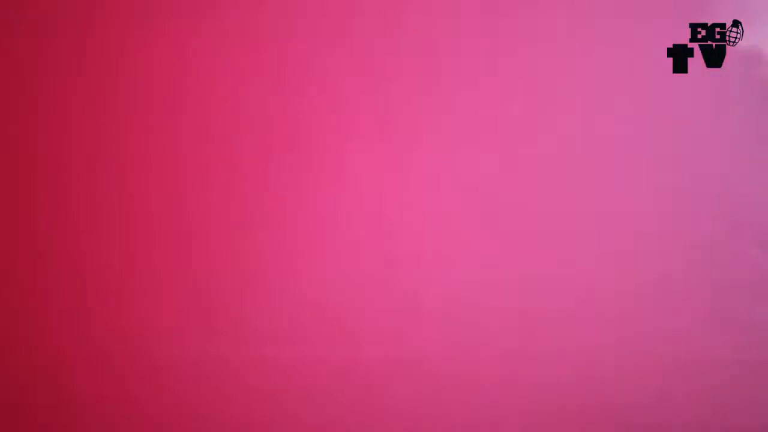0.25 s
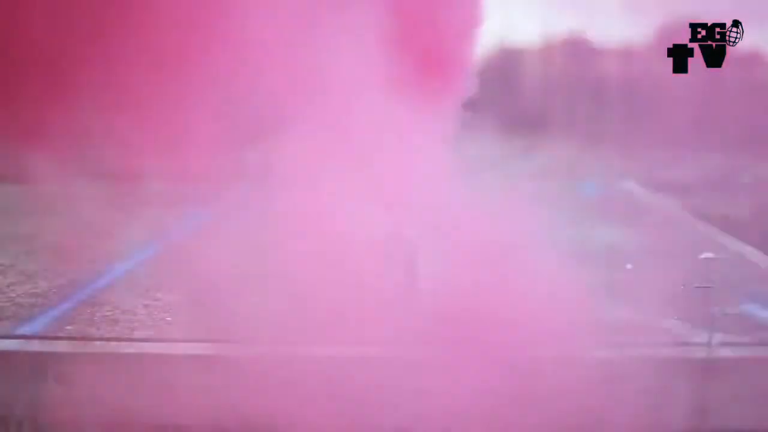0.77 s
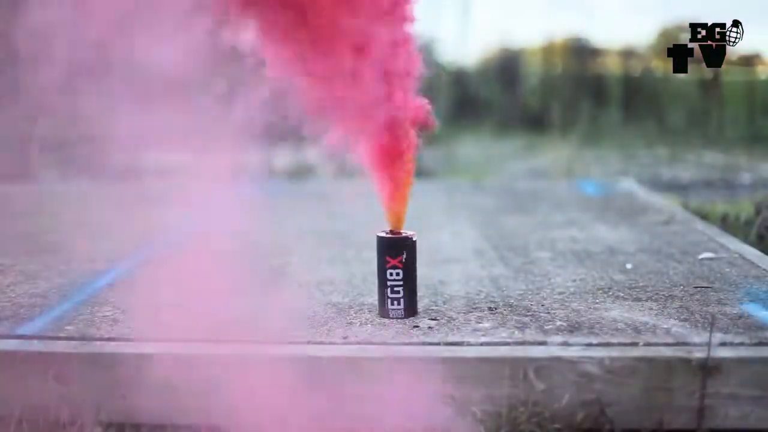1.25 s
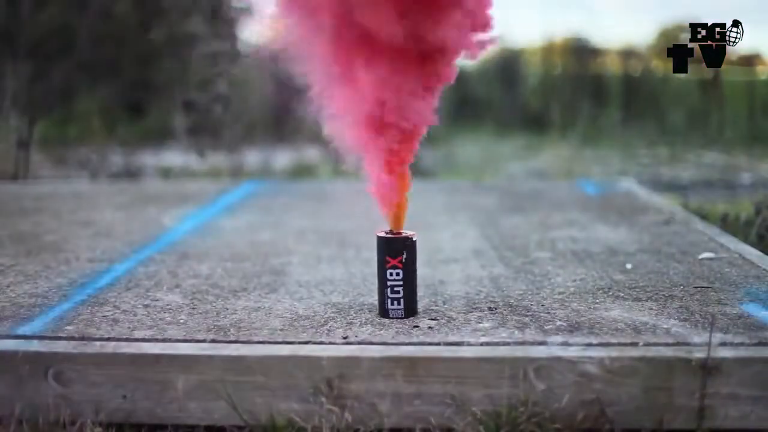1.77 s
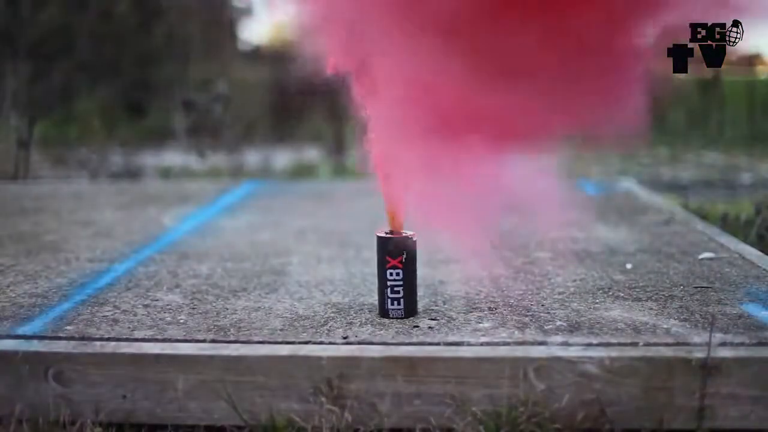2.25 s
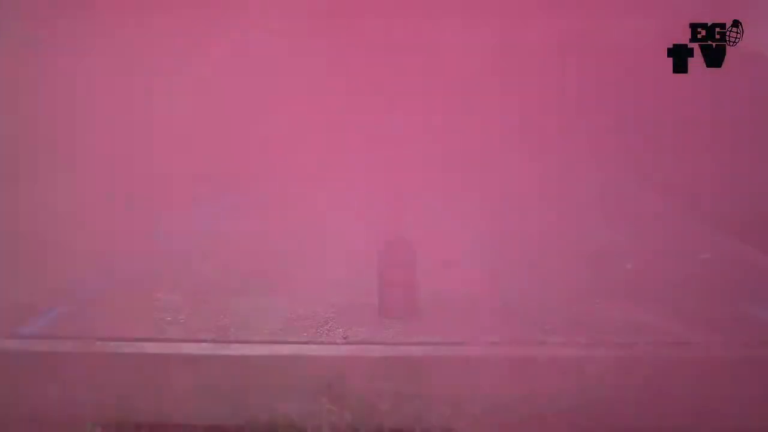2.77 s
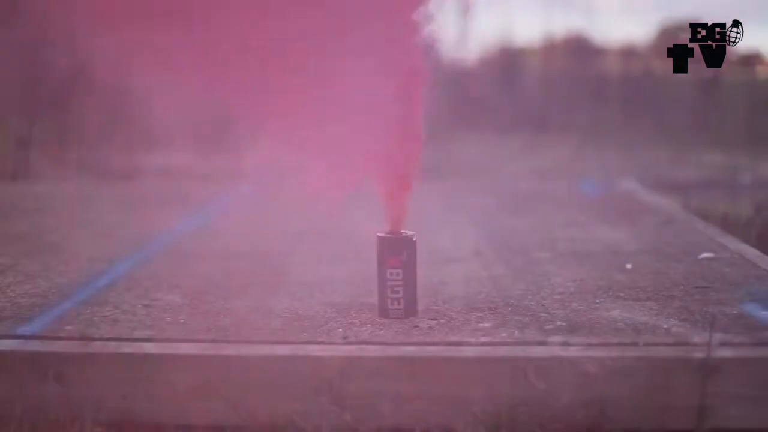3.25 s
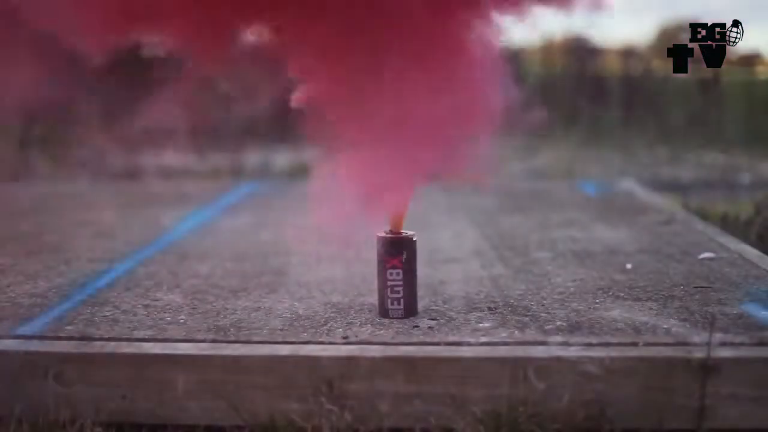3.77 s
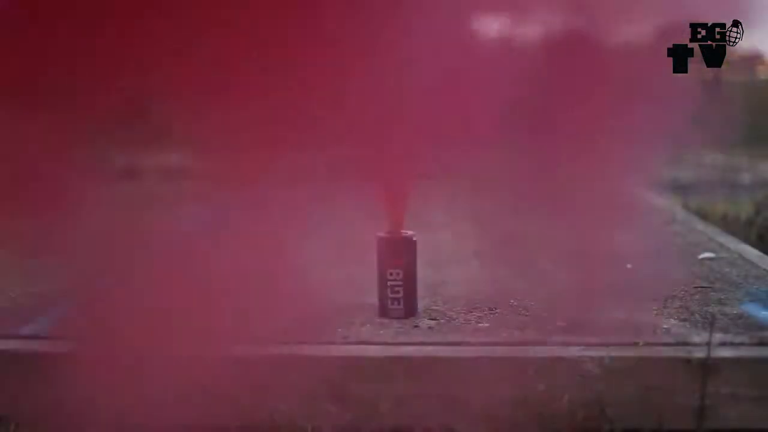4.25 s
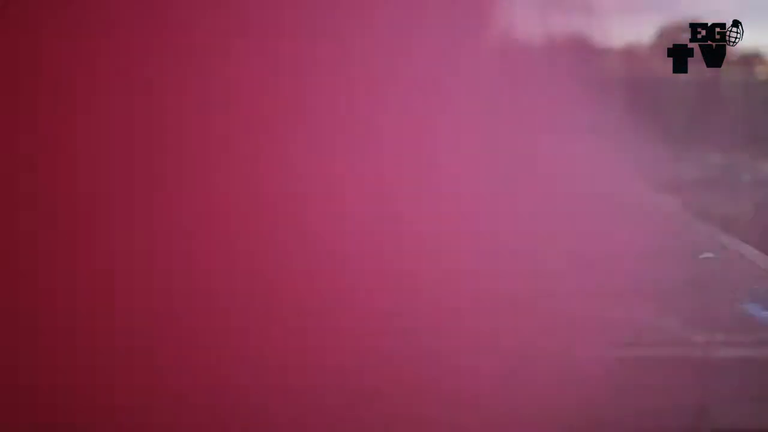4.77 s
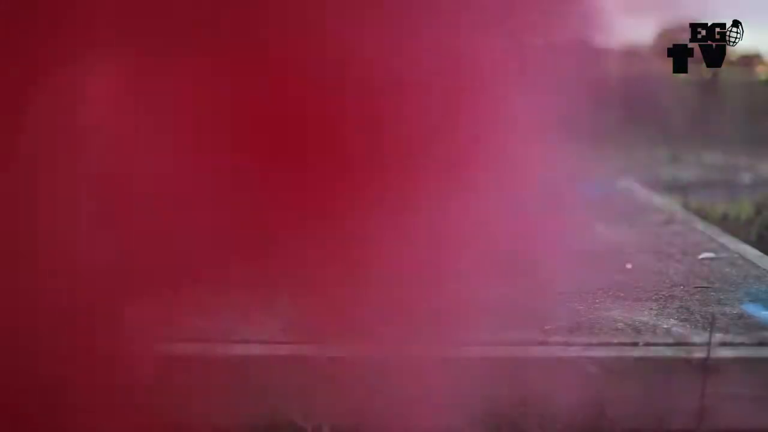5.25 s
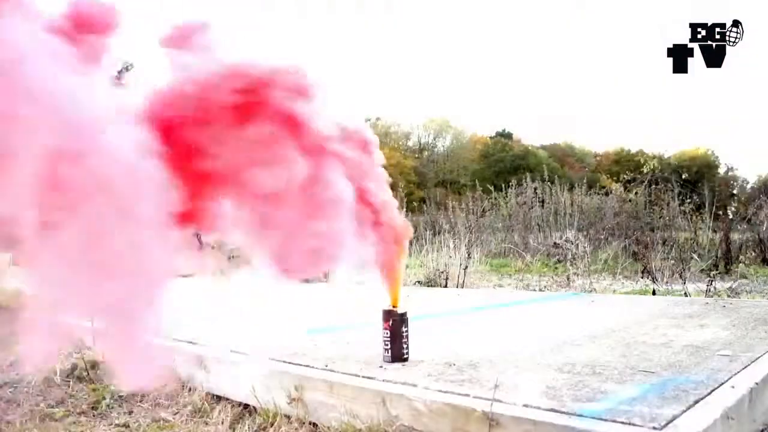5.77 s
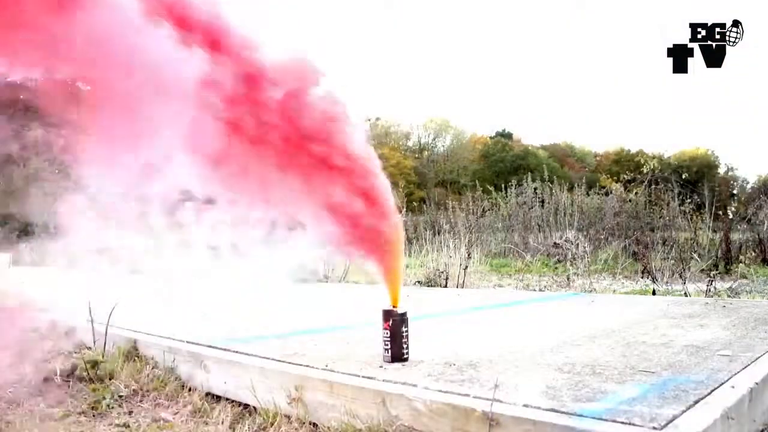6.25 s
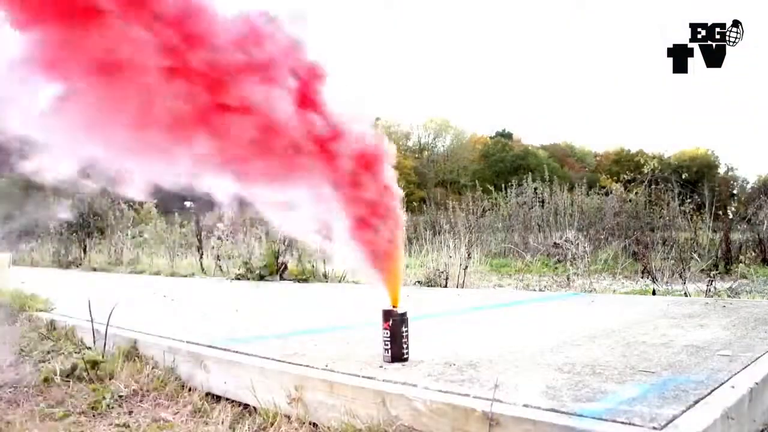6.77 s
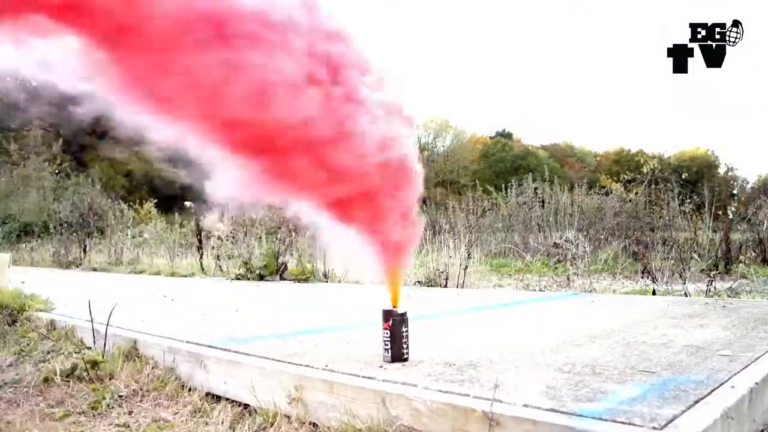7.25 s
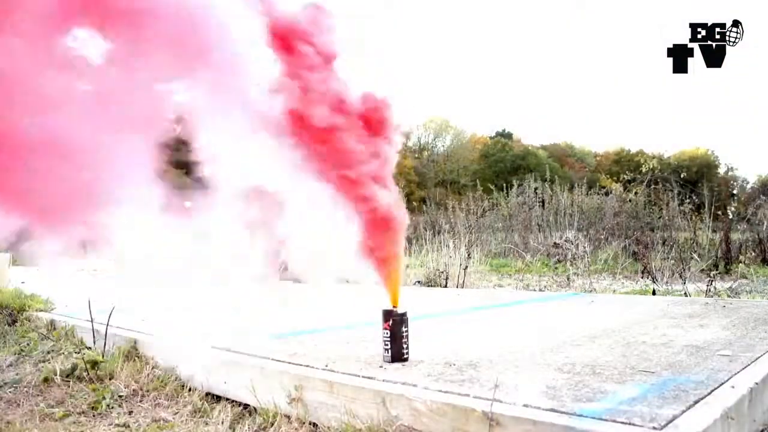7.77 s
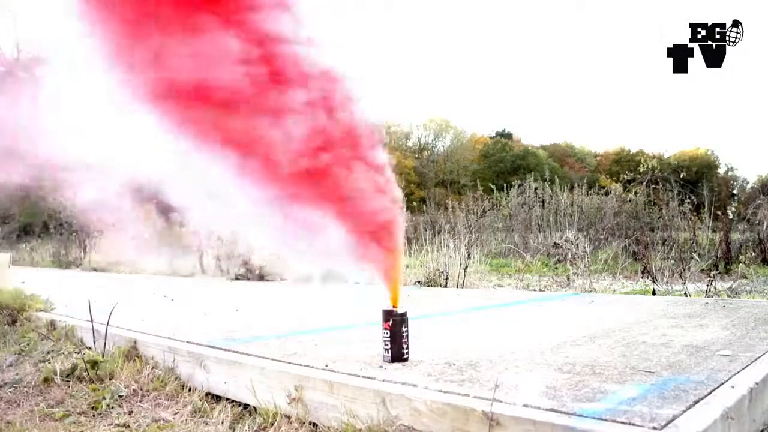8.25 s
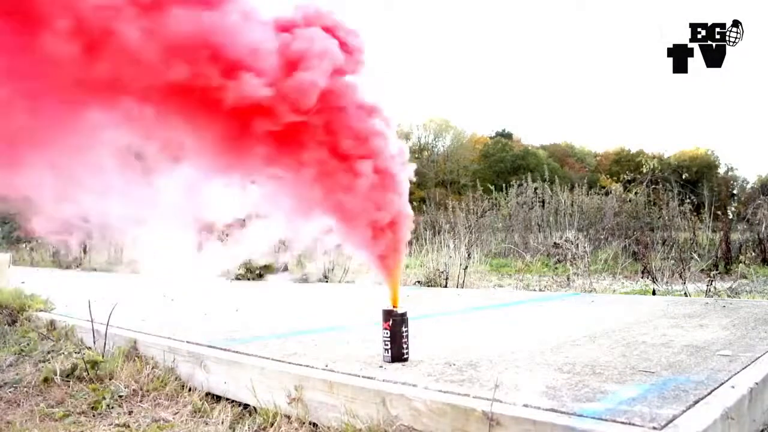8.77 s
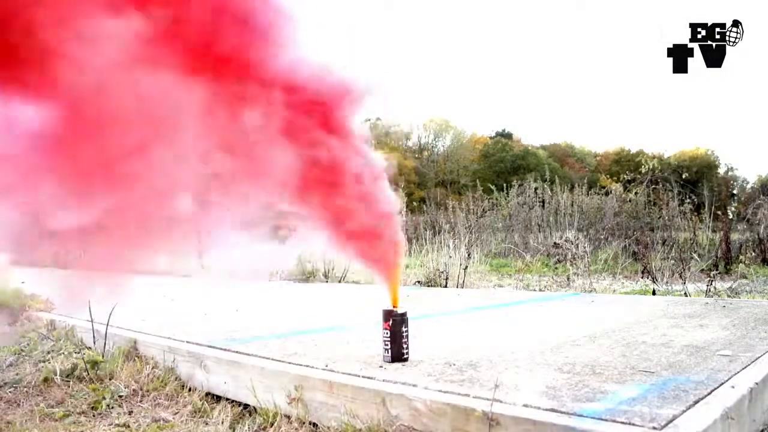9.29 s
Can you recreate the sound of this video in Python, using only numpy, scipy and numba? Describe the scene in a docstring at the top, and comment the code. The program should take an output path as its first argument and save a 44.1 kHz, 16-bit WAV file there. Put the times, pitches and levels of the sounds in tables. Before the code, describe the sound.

A pressurised jet of smoke hisses loudly beside the microphone outdoors, battered by low wind thumps, then abruptly sounds duller and more distant, fading under rumbling gusts.

```python
"""A gas jet hisses very close to the microphone, with hard wind thumps and ragged buffeting over it.
It is a smoke grenade burning on a concrete slab outdoors, heard in mono, then abruptly from further off in stereo.
Filtered noise with sparse impulses makes the jet; its level and treble follow curves and random flutter.
Wind is impulses through a moving low-pass plus deep noise; each thump is a push, a suck and a swing back."""
import sys
import numpy as np
from scipy import signal
from scipy.fft import rfft, irfft, next_fast_len
from scipy.io import wavfile
from scipy.ndimage import uniform_filter1d
from numba import njit

SR = 44100
rng = np.random.default_rng(int(sys.argv[2]) if len(sys.argv) > 2 else 0)


def dump(signal):
    """Clip the signal to [-1, 1] and save it as 16-bit WAV at the path in sys.argv[1]."""
    limited = np.clip(np.atleast_2d(signal).T, -1, 1)
    pcm = np.round(limited * 32767).astype(np.int16)
    wavfile.write(sys.argv[1], SR, pcm)


N = 419815
TIME = np.arange(N) / SR  # s
FREQ = np.maximum(np.arange(N // 2 + 1) * SR / N, 1)  # Hz

# the two microphone positions change over at this moment
CUT_S = 5.582

# jet from close by, before the trim: start_s, level_db, treble_db (relative to the level)
NEAR_JET_CURVE = [(0, -22, -3), (.8, -21.5, -4), (1.02, -18.5, -8), (1.16, -22, -5), (1.69, -22.5, -6),
                  (2.1, -22, -7), (2.84, -21.5, -5), (3.08, -23.5, -4.5), (3.75, -22.5, -2.5),
                  (4.28, -21, -4), (4.64, -21.5, -1.6), (4.97, -23, -5.5), (5.13, -26, -1),
                  (5.36, -28, -2.5), (5.45, -30, -6.5), (5.57, -30.5, -3.5)]
# jet from further off, fading as the wind bends the plume away, before the trim: start_s, level_db
FAR_JET_CURVE = [(5.6, -29.7), (5.95, -29.3), (6.3, -27), (7.06, -28), (7.3, -32.5), (7.56, -36),
                 (8.06, -29.5), (8.42, -31.5), (8.57, -31.5), (8.66, -34.5), (8.97, -39.5), (9.28, -36.5),
                 (9.5, -40.5)]
# broad colour of the jet at each distance: pitch_hz, density_db (dB per Hz)
NEAR_JET_COLOUR = [(60, -17), (280, -8), (500, -14), (700, -17), (1000, -12), (1650, -8.5), (2100, -0.5),
                   (2800, -2), (4000, -3), (6200, -4.5), (7100, -10), (10000, -20), (11500, -25),
                   (15500, -32.5)]
FAR_JET_COLOUR = [(60, -3.5), (350, -3.5), (480, -8), (660, -14.5), (1050, -7.5), (1500, -13), (2150, -1.5),
                  (2700, -1.5), (3700, -6.5), (4500, -12.5), (5500, -14.5), (7600, -22), (12500, -19.5),
                  (14000, -30)]
# vent resonances (+) and interference dips from the slab (-): centre_hz, width_hz, height_db
NEAR_RESONANCES = [(2400, 170, 3), (2850, 230, -2.5), (3340, 360, 2), (4745, 320, -4.5), (5330, 330, 1.5)]
FAR_RESONANCES = [(1636, 260, -11), (2270, 180, 3), (3200, 310, -5.5), (3600, 330, 1), (4760, 260, -6)]
# sound scattered by the surroundings: pitch_hz, level_db (relative to the direct hiss)
SCATTER_COLOUR = [(200, -17), (1200, -7.5), (2500, -12), (5000, -1), (9000, -3.5), (14000, -9.5)]
# a brighter jet also roars more: roar against hiss per dB of treble, and the treble where the two are even
ROAR_PER_TREBLE, EVEN_TREBLE_DB = 0.72, -4.5
# far off the treble fades less than the rest: its share at full level, that level, and dB gained per dB of fade
FAR_TREBLE_DB, FAR_FULL_DB, TREBLE_PER_FADE = -12, -26.5, 0.22
# harder wind tosses the plume more: level spread in calm air, and its growth per dB of buffeting
CALM_SURGE_DB, SURGE_PER_BUFFET = 0.09, 0.024

# single strong eddies, before the common gain and sharpening:
# centre_s, level_db, pitch_hz, pan_db (left minus right)
THUMP_EDDIES = [(0.08, -12.5, 100, 0), (0.09, -10, 231, 0), (0.351, -18, 80, 0), (1.207, -10.5, 120, 0),
                (1.311, -8, 111, 0), (1.338, -13, 110, 0), (1.443, -16, 100, 0), (1.499, -10, 210, 0),
                (1.567, -11.5, 200, 0), (1.62, -9, 227, 0), (1.996, -16.5, 100, 0), (2.156, -13, 190, 0),
                (2.197, -10.5, 200, 0), (2.544, -16, 100, 0), (2.65, -17.5, 130, 0), (2.777, -14.5, 110, 0),
                (2.942, -11.5, 136, 0), (4.882, -9, 110, 0), (4.931, -5, 150, 0), (4.949, -11, 150, 0),
                (4.965, -10, 140, 0), (5.038, -11, 130, 0), (5.125, -6, 162, 0), (5.186, -11.2, 200, 0),
                (5.224, -12.5, 100, 0), (5.357, -7, 190, 0), (5.376, -3, 167, 0), (5.382, -7, 343, 0),
                (5.485, -3.5, 119, 0), (5.503, -13, 110, 0), (5.568, -7.5, 180, 0.5),
                (7.742, -7.5, 151, -28)]
# gusts on the microphone, before the trim:
# start_s, length_s, buffet_db, rumble_db, pan_db (left minus right)
WIND_GUSTS = [(0.06, 0.032, -33, -29, 3), (0.13, 0.46, -40, -38, 0), (0.92, 0.09, -48, -40, -2),
              (1.169, 0.062, -25.5, -29, 1), (1.29, 0.076, -25.5, -30, 0.5), (1.428, 0.22, -27, -35, 1.5),
              (1.732, 0.34, -33, -33.5, 0), (2.11, 0.15, -34, -28.5, -2), (2.302, 0.22, -36.5, -36, -1),
              (2.526, 0.38, -33, -34.5, -1), (2.977, 0.078, -39, -38, 0), (3.664, 0.15, -39.5, -42, -2),
              (4.152, 0.24, -39, -38, 0), (4.506, 0.056, -32, -32, 1), (4.737, 0.15, -32, -32, 0),
              (4.856, 0.094, -21.5, -20, -2), (4.99, 0.054, -24.5, -23, 2), (5.12, 0.17, -28, -30.5, 3),
              (5.332, 0.041, -16.5, -22, 1.5), (5.454, 0.038, -18.5, -22, -0.5), (5.55, 0.03, -16, -23, -6),
              (5.598, 0.1, -49, -27.5, -17), (6.589, 0.12, -36, -21.5, 17), (6.893, 0.15, -38, -26.5, 2),
              (7.078, 0.14, -27.5, -22, -15), (7.238, 0.072, -22, -25, -16), (7.362, 0.14, -24.5, -27, -23),
              (7.26, 0.48, -37, -31.5, -4), (7.7, 0.079, -26, -23, -22), (7.846, 0.17, -41, -27, -5),
              (8.07, 0.46, -42, -25, 6), (8.567, 0.054, -29, -18.5, 9), (8.665, 0.19, -24, -23.5, 1.5),
              (8.871, 0.11, -22, -22, -8), (9.038, 0.06, -31, -27, 13), (9.13, 0.22, -38, -28, -5),
              (9.308, 0.17, -24, -22.5, -9.5)]
# colour of the eddies, and of the deep rumble at each distance: pitch_hz, density_db (dB per Hz)
EDDY_COLOUR = [(40, -33), (80, -5.5), (125, 3), (280, -3.5), (500, -10.5), (1000, -13.5), (2500, -20)]
NEAR_RUMBLE_COLOUR = [(12, -37), (30, -4), (60, 4.5), (100, 5.5), (160, -11.5), (400, -61)]
FAR_RUMBLE_COLOUR = [(10, -12), (25, 2.5), (55, 1), (90, -3.5), (160, -19), (400, -45)]
# a gust rises, holds and dies away; between gusts a light breeze remains
GUST_ATTACK_S, GUST_RELEASE_S = 0.036, 0.04
NEAR_BREEZE_BUFFET_DB, NEAR_BREEZE_RUMBLE_DB = -48, -56
FAR_BREEZE_BUFFET_DB, FAR_BREEZE_RUMBLE_DB = -48.5, -35


def gas(sputter_db):
    """Turbulent gas is noise; burning grains add tiny bursts at random."""
    sputter = grains(rate=500, spread_db=5.0)
    return rng.standard_normal(N) + undb(sputter_db) * sputter


def flicker(x, flicker_db, shimmer_db):
    """Broad bands of the hiss flicker quickly; narrow ones drift up and down at random, more slowly."""
    _, _, spectrum = signal.stft(x, nperseg=512)

    def drift(bins, frames):
        noise = rng.standard_normal(spectrum.shape[-2:])
        across_bands = uniform_filter1d(noise, size=bins, axis=0)
        return unit(uniform_filter1d(across_bands, size=frames, axis=1))

    quick = drift(bins=24, frames=7)
    slow = drift(bins=2, frames=30)
    gain = undb(flicker_db * quick + shimmer_db * slow)
    return signal.istft(spectrum * gain)[1][..., :N]


def jet(source, level_db, treble_db, roar_db, colour, treble_hz, flutter_db, surge_db):
    """Large eddies give the roar, small ones the hiss and sizzle; the uneven burn shakes them all."""
    core_band = (FREQ > 1900) & (FREQ < 4500)
    top_band = (FREQ > treble_hz) & (FREQ < 12000)
    core_gain = np.sqrt(np.mean((colour * core_band) ** 2))
    top_gain = np.sqrt(np.mean((colour * top_band) ** 2))
    # soft crossovers split the colour into three bands
    above_roar = 1 / (1 + (2900 / FREQ) ** 8)
    above_hiss = 1 / (1 + (treble_hz / FREQ) ** 8)
    roar = shape(source, colour * (1 - above_roar) / core_gain) * undb(roar_db / 2)
    hiss = shape(source, colour * (above_roar - above_hiss) / core_gain) * undb(-roar_db / 2)
    sizzle = shape(source, colour * above_hiss / top_gain)
    sizzle = sizzle * undb(treble_db + surge_db * walk(14))
    sway_db = flutter_db * walk(35) + surge_db * walk(8)
    return (roar + hiss + sizzle) * undb(level_db + sway_db)


def tossing(buffet_db):
    """How far the level of the jet sways in this wind, in dB: more in harder wind."""
    strongest = buffet_db.max(axis=0)
    return CALM_SURGE_DB + SURGE_PER_BUFFET * (strongest - strongest.min())


def delayed(x, lag_s, onset_hz):
    """Short waves must travel round the housing to the far port; long ones arrive almost together."""
    lag = lag_s * FREQ ** 2 / (FREQ ** 2 + onset_hz ** 2)
    return shape(x, np.exp(-2j * np.pi * FREQ * lag))


def thumps(gain_db, sharpness, push, rebound):
    """A strong eddy pushes on the diaphragm, sucks at it as its core passes, then lets it swing back."""
    out = np.zeros((2, N))
    for centre_s, level_db, pitch_hz, pan_db in THUMP_EDDIES:
        near = np.abs(TIME - centre_s) < .03
        phase = 2 * np.pi * pitch_hz * (TIME[near] - centre_s) * sharpness
        suck = np.exp(-phase ** 2)
        before = push * np.exp(-(phase / 2 + 1) ** 2)
        after = rebound * np.exp(-((phase - 2) / 2.0) ** 2)
        out[:, near] += sides(pan_db)[:, None] * undb(level_db + gain_db) * (before + after - suck)
    return out


def wind(buffet_db, rumble_db, rumble_colour, eddy_rate, corner_hz, highest_hz, db_per_octave, ragged_db):
    """Eddies strike one port; faster air makes them shorter, so a gust is brighter as well as louder."""
    swirl_db = ragged_db * walk(45)
    eddies = shape(grains(eddy_rate, spread_db=2.5), response(EDDY_COLOUR))
    # the corner is corner_hz where buffeting and swirl together reach -26.5 dB
    corner = corner_hz * 2 ** ((buffet_db + swirl_db + 26.5) / db_per_octave)
    dulled = lowpass(eddies * undb(swirl_db), np.clip(corner, 90, highest_hz), 0.97)
    buffet = even(dulled, span_s=0.057)
    # the same swirls shake the deep rumble, though less
    swell = shape(rng.standard_normal(N), response(rumble_colour) / (1 + (FREQ / 500) ** 2))
    rumble = even(swell * undb(0.62 * swirl_db), span_s=0.061)
    return buffet * undb(buffet_db) + rumble * undb(rumble_db)


def gusting(rows, breeze_buffet_db, breeze_rumble_db):
    """Buffeting and rumble in dB at each port: the gusts add their power to the breeze."""
    buffet = np.full((2, N), undb(breeze_buffet_db) ** 2)
    rumble = np.full((2, N), undb(breeze_rumble_db) ** 2)
    for start_s, length_s, buffet_db, rumble_db, pan_db in rows:
        rise = np.clip((TIME - start_s) / GUST_ATTACK_S + .5, 0, 1)
        fall = np.exp(-np.clip((TIME - start_s - length_s) / GUST_RELEASE_S, 0, 20))
        power = (sides(pan_db)[:, None] * rise * fall) ** 2
        buffet = buffet + power * undb(buffet_db) ** 2
        rumble = rumble + power * undb(rumble_db) ** 2
    return 10 * np.log10(buffet), 10 * np.log10(rumble)


def close_by():
    """Jet and ragged wind on one microphone beside the slab."""
    rows = [gust for gust in WIND_GUSTS if gust[0] < CUT_S]
    buffet_db, rumble_db = gusting(rows, NEAR_BREEZE_BUFFET_DB, NEAR_BREEZE_RUMBLE_DB)
    source = flicker(gas(sputter_db=-12.5), flicker_db=0.42, shimmer_db=1.09)
    level_db, treble_db = controls(NEAR_JET_CURVE)
    roar_db = ROAR_PER_TREBLE * (treble_db - EVEN_TREBLE_DB)
    colour = response(NEAR_JET_COLOUR, NEAR_RESONANCES)
    hiss = jet(source, level_db, treble_db, roar_db, colour, treble_hz=4600,
               flutter_db=0.2, surge_db=tossing(buffet_db))
    # one microphone: only the left port's wind is used
    gusts = wind(buffet_db[0], rumble_db[0], NEAR_RUMBLE_COLOUR, eddy_rate=500, corner_hz=352,
                 highest_hz=700, db_per_octave=12, ragged_db=4.0)
    return undb(0.06) * hiss + undb(0.44) * gusts


def further_off():
    """A duller jet on a stereo pair; each port meets its own dense stream of eddies."""
    rows = [gust for gust in WIND_GUSTS if gust[0] >= CUT_S]
    buffet_db, rumble_db = gusting(rows, FAR_BREEZE_BUFFET_DB, FAR_BREEZE_RUMBLE_DB)
    # the direct hiss reaches the left port first; scattered sound differs between the ports
    direct = gas(sputter_db=-16.0)
    ports = np.array([direct, delayed(direct, lag_s=3.4e-5, onset_hz=2500)])
    scattered = shape(rng.standard_normal((2, N)), response(SCATTER_COLOUR))
    source = flicker(ports + scattered, flicker_db=.5, shimmer_db=1.25)
    level_db, = controls(FAR_JET_CURVE)
    treble_db = FAR_TREBLE_DB + TREBLE_PER_FADE * (FAR_FULL_DB - level_db)
    colour = response(FAR_JET_COLOUR, FAR_RESONANCES)
    hiss = jet(source, level_db, treble_db, roar_db=.3, colour=colour, treble_hz=6300,
               flutter_db=.5, surge_db=tossing(buffet_db))
    gusts = [wind(buffet_db[port], rumble_db[port], FAR_RUMBLE_COLOUR, eddy_rate=1500, corner_hz=245,
                  highest_hz=352, db_per_octave=19, ragged_db=3.0)
             for port in range(2)]
    return undb(-0.2) * hiss + undb(1.26) * np.array(gusts)


def undb(db):
    """Decibels to gain."""
    return 10 ** (np.asarray(db) / 20)


def unit(x):
    """Scale to rms 1."""
    return x / np.sqrt(np.mean(x ** 2))


def controls(table):
    """The columns of a curve table, one value a sample."""
    start_s, *columns = np.transpose(table)
    return [np.interp(TIME, start_s, column) for column in columns]


def response(points, bells=()):
    """Gain over frequency: a broad colour with bell-shaped peaks and dips."""
    pitch_hz, db = np.transpose(points)
    curve_db = np.interp(np.log(FREQ), np.log(pitch_hz), db)
    for centre_hz, width_hz, height_db in bells:
        curve_db = curve_db + height_db / 2 ** ((2 * (FREQ - centre_hz) / width_hz) ** 2)
    return undb(curve_db)


def shape(x, gain):
    """Filter by a gain over frequency."""
    size = next_fast_len(N, real=True)
    bins_hz = np.arange(size // 2 + 1) * SR / size
    return irfft(rfft(x, size) * np.interp(bins_hz, FREQ, gain), size)[..., :N]


def walk(rate):
    """Random levels held 1 / rate s and slewed; spread 1."""
    hold = max(int(SR / rate), 1)
    steps = np.repeat(rng.standard_normal(N // hold + 2), hold)
    held = steps[rng.integers(hold):][:N]
    return unit(uniform_filter1d(held, hold))


def grains(rate, spread_db):
    """Random impulses of either sign, rate a second on average, mostly small and a few large."""
    hit = rng.random(N) < rate / SR
    size = undb(spread_db * np.minimum(rng.exponential(size=N), 4))
    return unit(hit * size * rng.choice([-1, 1], N))


def even(x, span_s):
    """Hold the rms near 1 over spans of this length, keeping the faster raggedness."""
    span = max(int(span_s * SR), 1)
    power = uniform_filter1d(uniform_filter1d(x ** 2, span), span)
    return x / np.sqrt(power + 1e-9)


def sides(pan_db):
    """Left and right gains of constant total power."""
    gain = undb(np.array([pan_db, -pan_db]) / 2)
    return gain / np.sqrt(np.mean(gain ** 2, axis=0))


@njit
def lowpass(x, hz, damping):
    """State-variable low-pass with a moving corner."""
    y, band, low = np.empty(len(x)), 0., 0.
    for i in range(len(x)):
        g = np.tan(np.pi * hz[i] / SR)
        v = (band + g * (x[i] - low)) / (1 + g * (g + damping))
        y[i] = low + g * v
        band, low = 2 * v - band, 2 * y[i] - low
    return y


def scene():
    """The close position gives way to the far one in an instant; thumps lie over both."""
    far = uniform_filter1d((TIME > CUT_S) * 1., size=256)
    positions = (1 - far) * close_by() + far * further_off()
    return positions + thumps(gain_db=3.0, sharpness=1.13, push=0.15, rebound=0.37)


def record(dry):
    """The recorder blocks the deepest pressure swings and cuts the top above 15.5 kHz."""
    low_cut = signal.butter(1, 12, "high", fs=SR, output="sos")
    top_cut = signal.ellip(10, .2, 80, 15500, fs=SR, output="sos")
    return signal.sosfilt(top_cut, signal.sosfilt(low_cut, dry))


dry = scene()
out = record(dry)
dump(out)
```